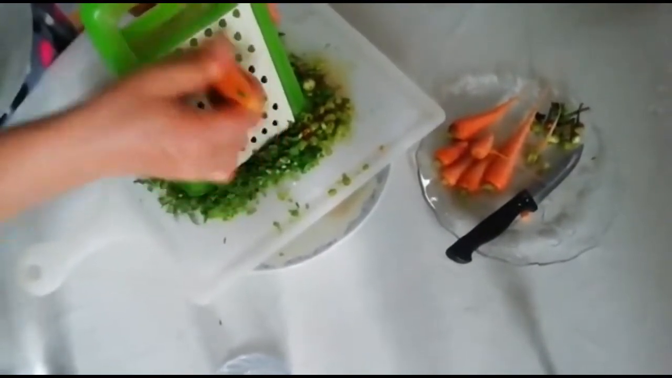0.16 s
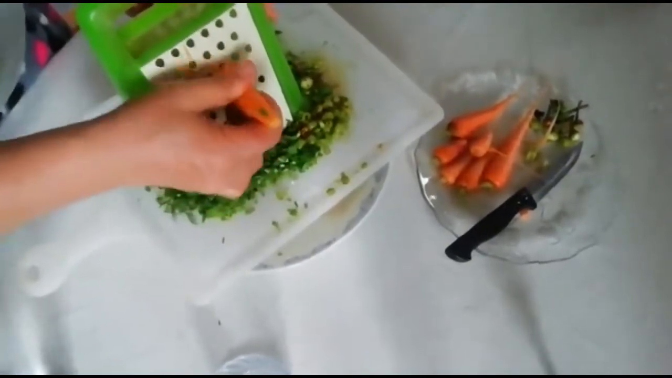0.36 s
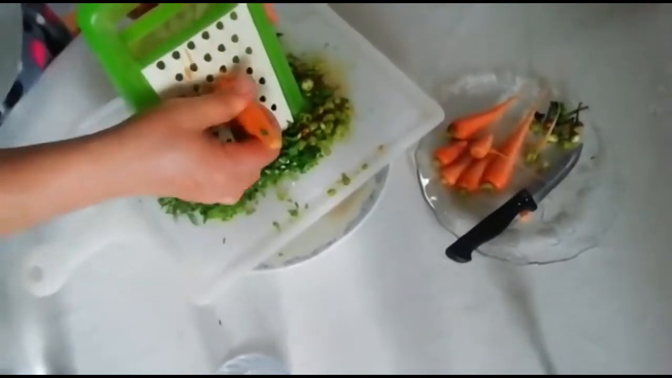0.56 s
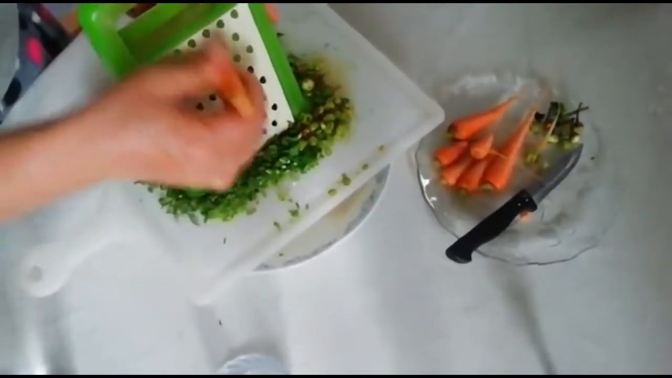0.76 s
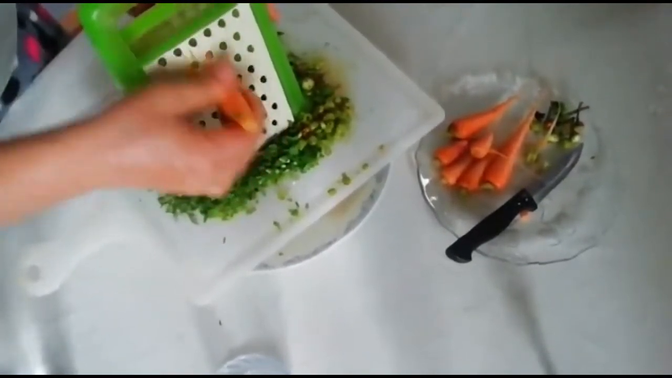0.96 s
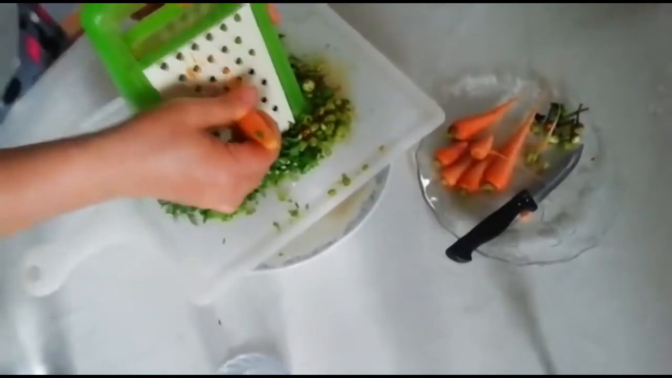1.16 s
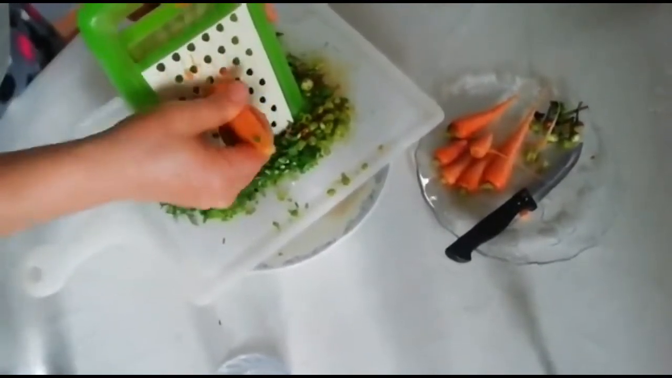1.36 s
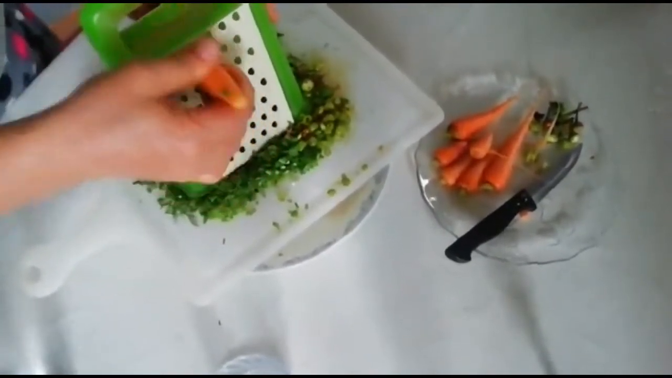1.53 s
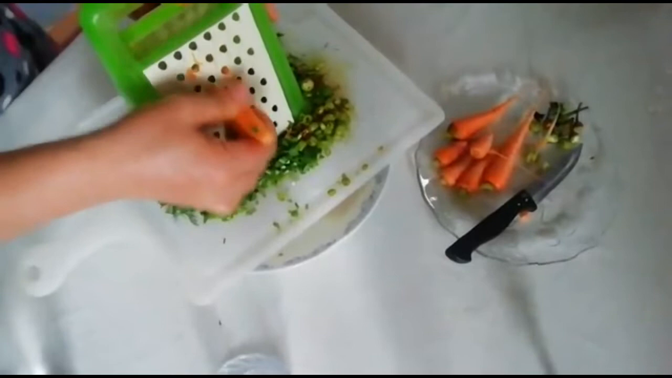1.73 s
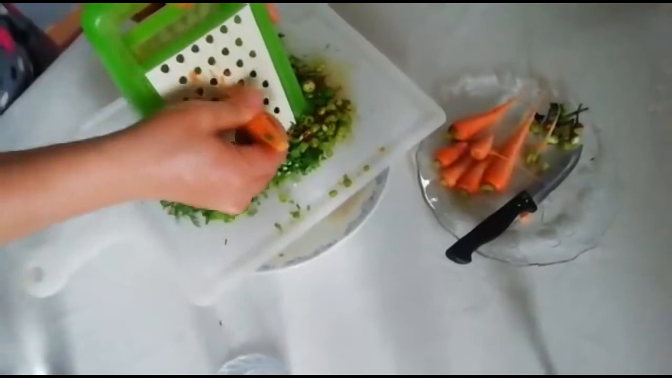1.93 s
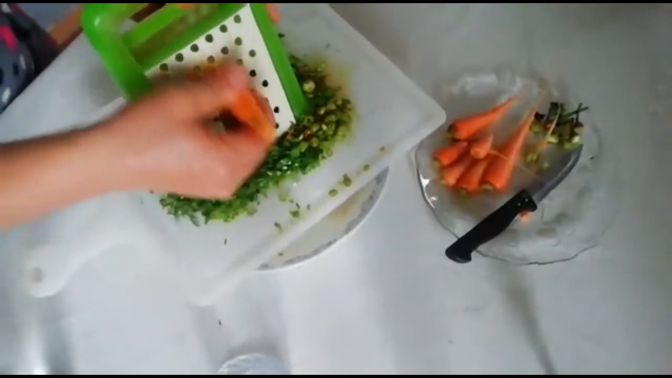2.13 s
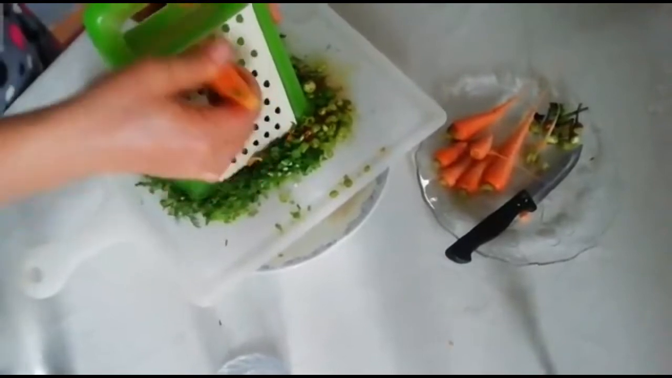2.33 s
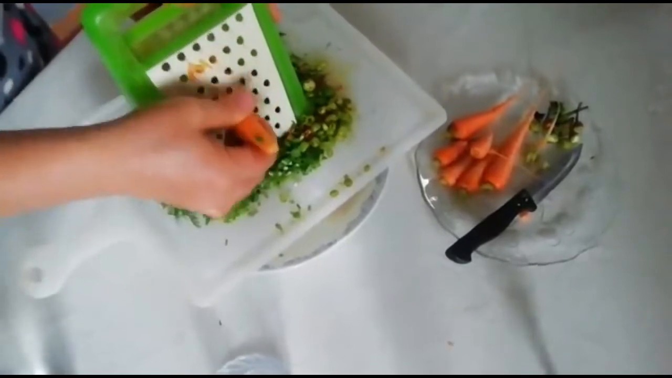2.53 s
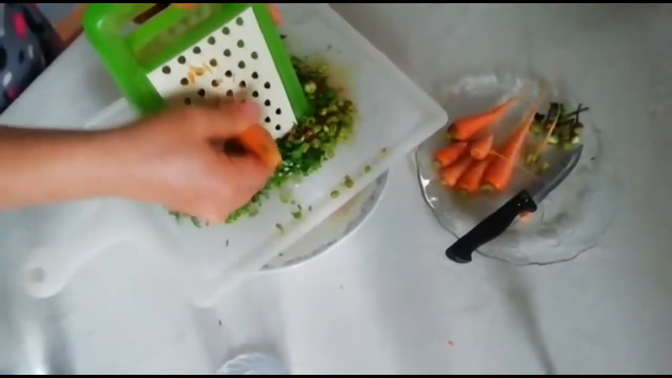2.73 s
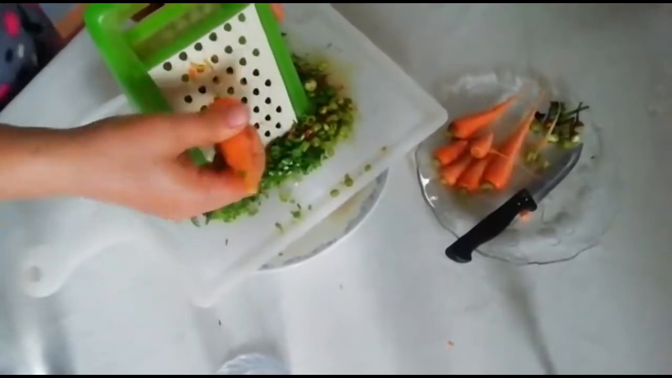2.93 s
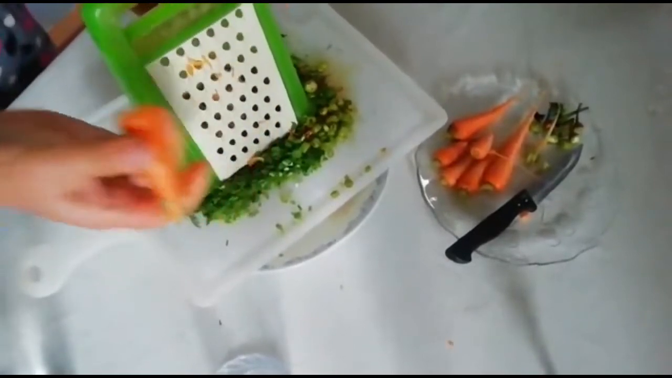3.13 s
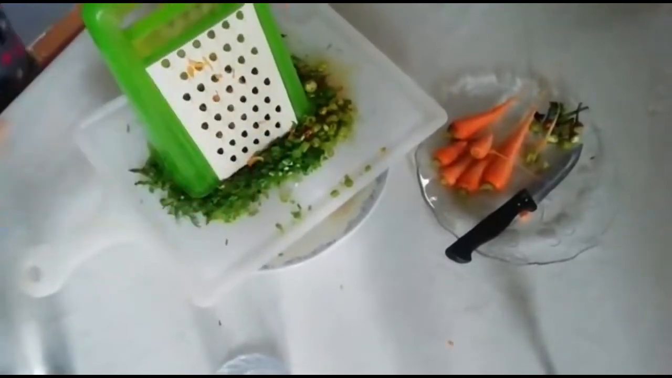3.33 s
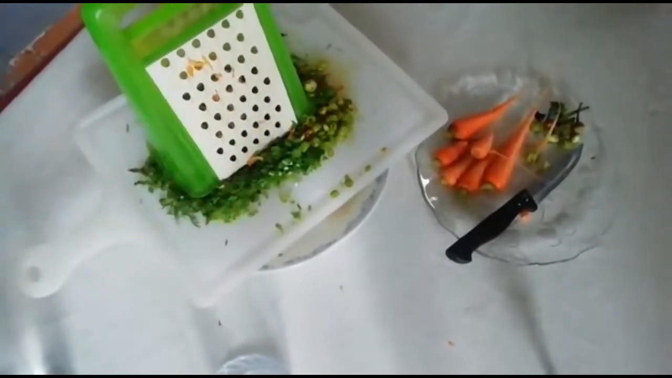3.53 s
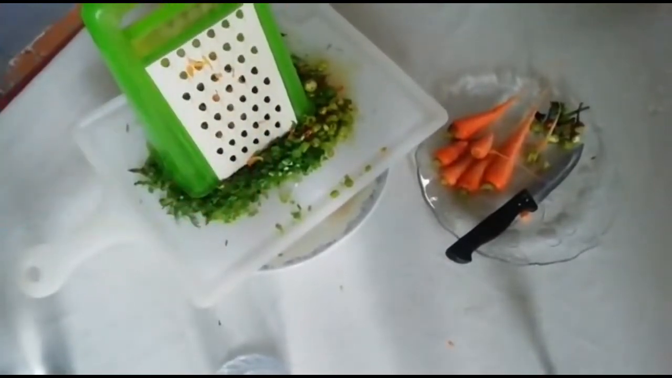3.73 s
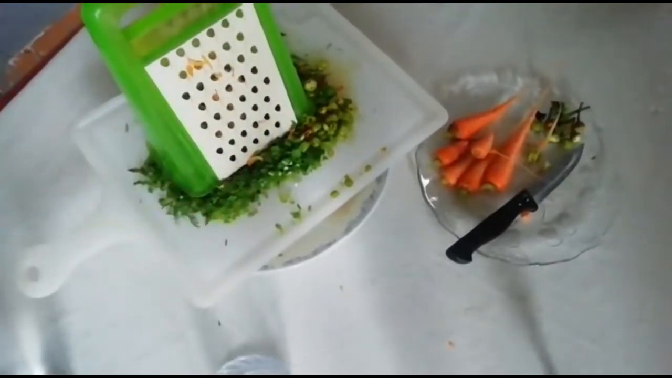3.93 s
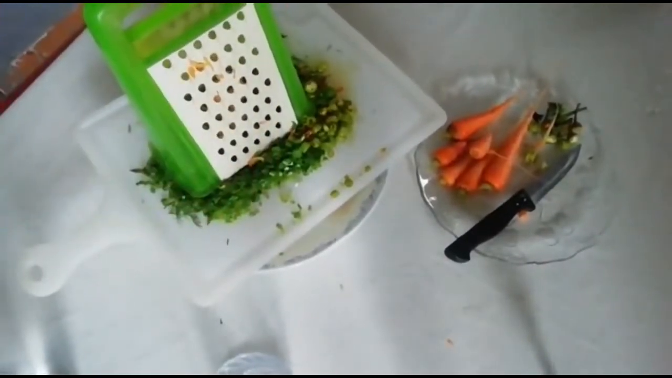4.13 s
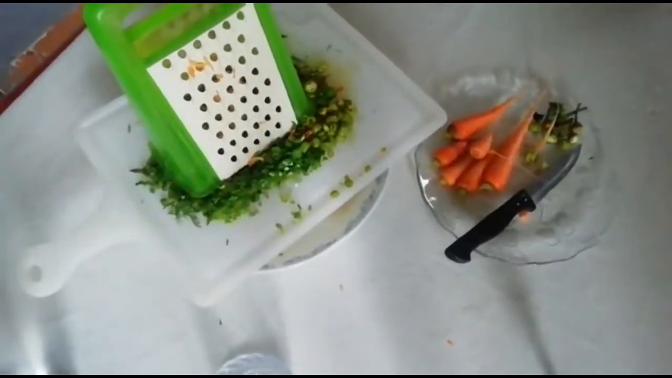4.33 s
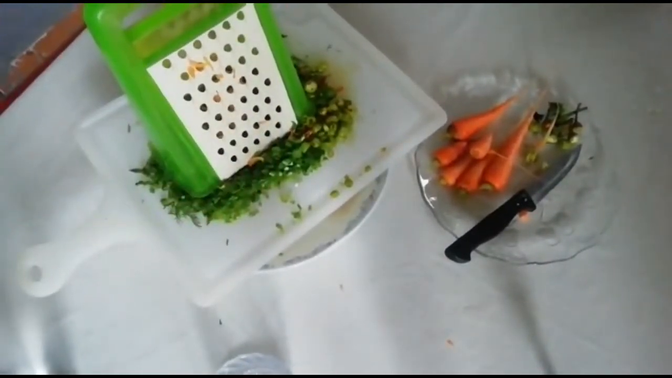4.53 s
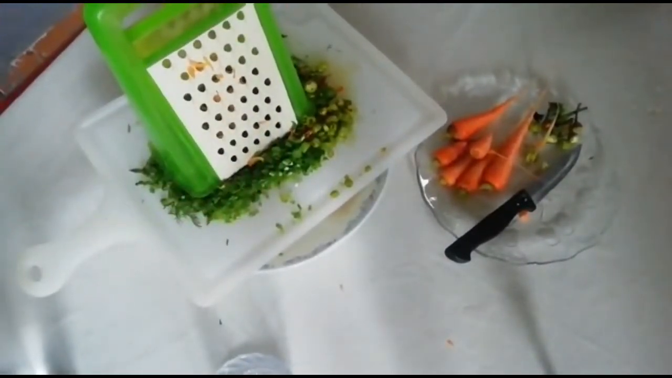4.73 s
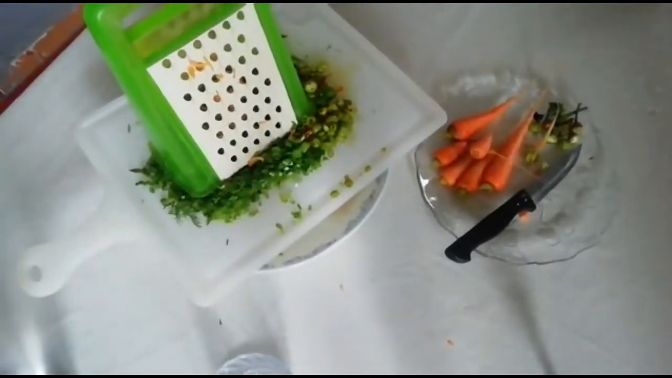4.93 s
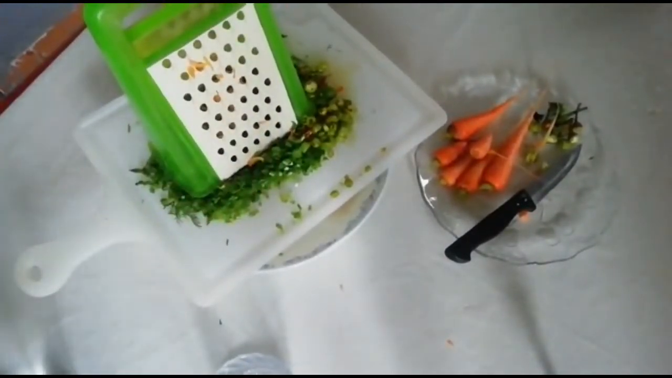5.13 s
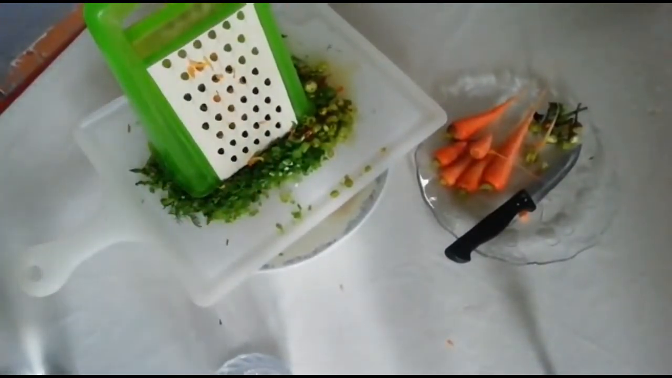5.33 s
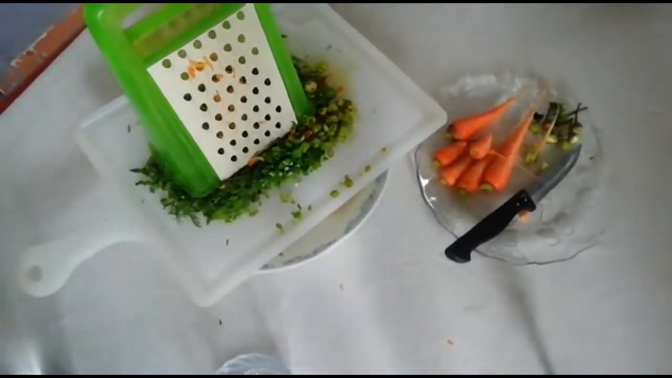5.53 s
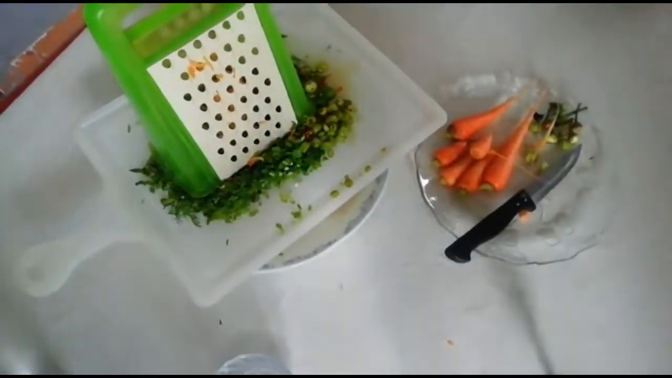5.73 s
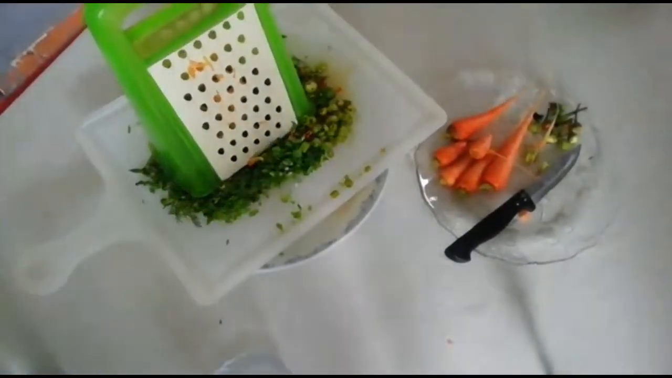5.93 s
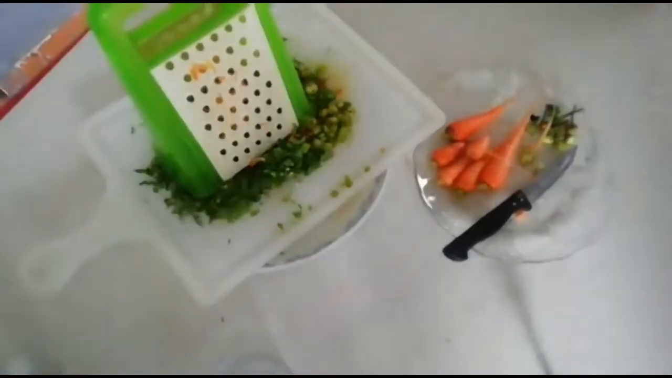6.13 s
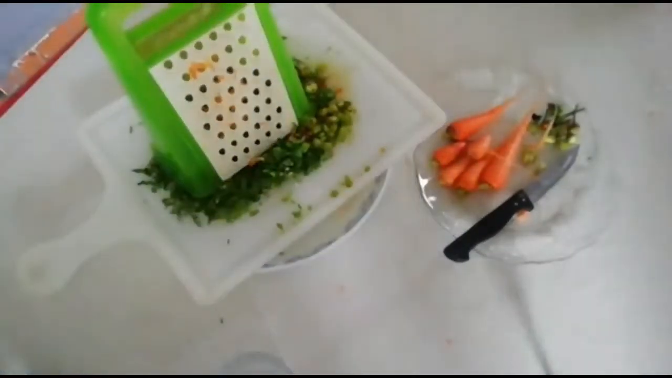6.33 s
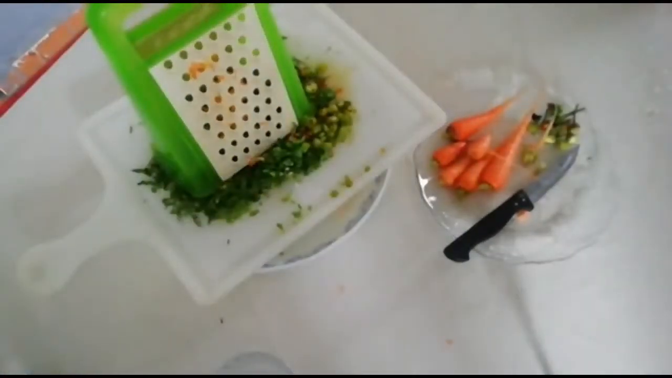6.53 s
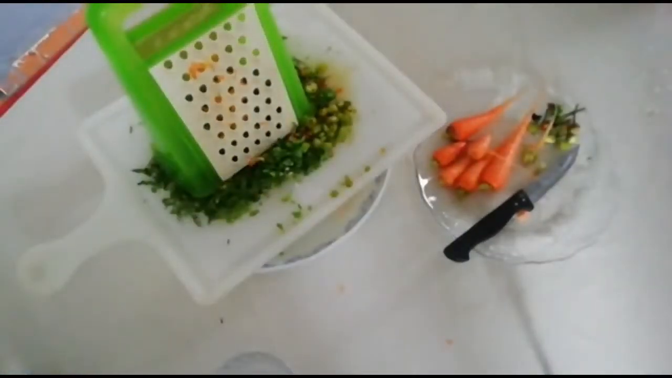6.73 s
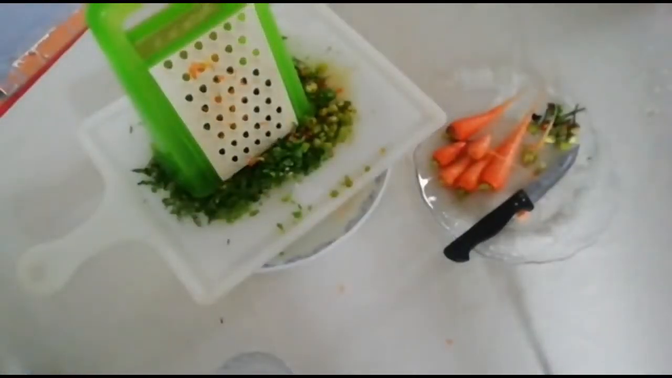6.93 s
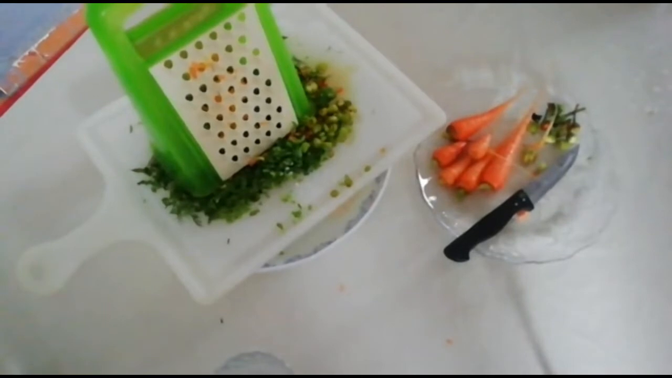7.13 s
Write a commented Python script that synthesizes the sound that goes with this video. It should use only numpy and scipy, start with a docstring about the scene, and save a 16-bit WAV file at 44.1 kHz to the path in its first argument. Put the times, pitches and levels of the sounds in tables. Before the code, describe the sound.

Brisk, coarse rasping of carrot on a plastic box grater, close up, stops after about three seconds, leaving faint floor booms, rustling and a light knock.

```python
"""Quick rasping strokes: a carrot is grated by hand on a plastic box grater, close to two microphones.
Each stroke tears fibres on row after row of teeth, as bursts of noise that ring the modes of the hollow box
and of the table; the way back only brushes the box. Then the hand leaves: someone walks about the quiet
kitchen, the floor booms as a low wavering tone, clothes rustle as noise, the table takes a light knock.
Steady room noise and faint appliance tones lie beneath."""
import sys
import numpy as np
from scipy import signal
from scipy.fft import rfft, irfft, next_fast_len
from scipy.io import wavfile
from scipy.ndimage import uniform_filter1d, map_coordinates

SR = 44100
rng = np.random.default_rng(int(sys.argv[2]) if len(sys.argv) > 2 else 0)


def transcribe(u):
    """Save the signal u as a 16-bit wav file named by the first command-line argument.

    u: samples, shape (n,) or (channels, n), limited to [-1, 1]; the rate is SR.
    q: integer samples, one column per channel.
    """
    v = np.clip(np.atleast_2d(u).T, -1, 1)
    q = np.round(v * 32767).astype(np.int16)
    wavfile.write(sys.argv[1], SR, q)


N = 317059
EARLY = SR // 5  # samples
# time starts early, so that a stroke before zero still rings
TIME = np.arange(-EARLY, N) / SR

# cutting strokes, as drive before the mix: touch t/s, rise to full pressure/s, time at full pressure/s,
# tearing level/dB, box level/dB, tilt of upper over lower box modes/dB, low box modes level/dB, table level/dB
CUTTING_STROKES = [(-.07, 0.018, 0.042, -14.5, -17, -2.5, -17, -30.5),
                   (0.176, 0.041, 0.034, -13.5, -23.5, 5, -17.5, -37.5),
                   (0.46, 0.03, 0.024, -14, -18.5, 9.5, -21, -30.5),
                   (0.733, 0.0038, 0.052, -19.5, -21, 1.5, -24, -35),
                   (0.994, 0.02, 0.063, -14, -21, 0.5, -21.5, -39),
                   (1.265, 0.025, 0.022, -13.5, -16, -4.5, -19.5, -32.5),
                   (1.525, 0.025, 0.056, -13.5, -15, -0.5, -18.5, -30.5),
                   (1.805, 0.0049, 0.079, -13, -17, -1, -19, -26.5),
                   (2.069, 0.0036, 0.05, -14, -18, -4.5, -21, -31.5),
                   (2.336, 0.026, 0.059, -12.5, -14, -2.5, -23, -35.5),
                   (2.607, 0.024, 0.041, -14.5, -15.5, -2, -25.5, -37)]
# likeness of left and right in the room: f/Hz, likeness (1 is identical)
LEFT_RIGHT_LIKENESS = [(60, 1), (240, 0.96), (950, 0.068), (3770, 0.095), (15000, 0.059)]

AIR_LAG_S = .0006  # floor, room noise and hum reach the left microphone later


def amp(db):
    """Gain of a level in dB."""
    return 10 ** (np.asarray(db) / 20)


def unit(x):
    """Scaled to rms 1."""
    return x / np.sqrt(np.mean(x ** 2) + 1e-20)


def along(points, hz):
    """Interpolates (Hz, value) points on a log frequency axis."""
    f, v = np.transpose(points)
    return np.interp(np.log(hz + 1), np.log(f + 1), v)


def add(track, s, shape):
    """Adds a shape to a track from time s on, cut off at the track's end."""
    part = track[..., EARLY + round(s * SR):][..., :np.shape(shape)[-1]]
    part += shape[..., :part.shape[-1]]


def wobble(rate):
    """A smooth random curve, rate knots a second."""
    where = (TIME - TIME[0]) * rate
    return map_coordinates(rng.standard_normal(int(where[-1]) + 4), [where])


def swell(length, early=1):
    """A smooth rise and fall over length seconds; early under 1 brings the peak forward."""
    return np.sin(np.pi * np.linspace(0, 1, round(abs(length) * SR) + 2) ** early)


def filtered(x, response):
    """x through a complex response of frequency, with padding so that the tail does not wrap."""
    m = next_fast_len(x.shape[-1] + SR // 2)
    spectrum = rfft(x, m) * response(np.fft.rfftfreq(m, 1 / SR))
    return irfft(spectrum, m)[..., :x.shape[-1]]


def modes(resonances):
    """Causal response of resonances (Hz, width Hz, dB) with alternating signs."""
    def response(f):
        total = 0
        for k, (centre, width, db) in enumerate(resonances):
            damping = 1j * f * width
            total = total + (-1) ** k * amp(db) * damping / (centre * centre - f * f + damping)
        return total
    return response


def driven(gain, response, spread_db, count):
    """Unrelated streams of tiny unequal ruptures under one gain, through a response that keeps their rms."""
    sizes = amp(spread_db * rng.standard_normal((count, len(TIME))))
    grit = rng.standard_normal((count, len(TIME))) * sizes
    return filtered(grit * gain, response) / np.std(filtered(grit, response))


def pair(response, alike, length=len(TIME)):
    """Stereo noise of rms 1, partly shared by both sides."""
    def shaped(hz):
        turn = np.arccos(np.clip(along(alike, hz), -1, 1)) / 2
        return response(hz) * [np.cos(turn), np.sin(turn)]
    mid, side = filtered(rng.standard_normal((2, length)), shaped)
    return unit(np.array([mid + side, mid - side]))


def lagged(x, lag_s):
    """Sound that reaches the right microphone lag_s before the left."""
    return filtered(x, lambda hz: np.exp(-1j * np.pi * hz * lag_s * np.array([[1], [-1]])))


def room(x):
    """The walls answer differently on each side, swinging between two tails; each frequency dies at its own speed."""
    # reverberation: f/Hz, t60/s
    decay = [(200, 0.23), (1000, 0.24), (4000, 0.27), (12000, 0.17)]
    hz, t, z = signal.stft(rng.standard_normal((2, 2, SR // 2)), SR, nperseg=256)
    # long waves reach both microphones alike
    alike = np.clip(along(LEFT_RIGHT_LIKENESS, hz), 0, 1)[:, None]
    z[:, 1] = alike * z[:, 0] + np.sqrt(1 - alike ** 2) * z[:, 1]
    fade = amp(-60 * t / along(decay, hz)[:, None])
    tails = signal.istft(z * fade, SR, nperseg=256)[1]
    tails = tails / np.linalg.norm(tails, axis=2, keepdims=True)
    turn = 2 * np.pi * 1.3 * TIME  # 1.3 swings a second
    answer = 0
    for weight, tail in zip((np.cos(turn), np.sin(turn)), tails):
        answer = answer + signal.fftconvolve(x * weight, tail, axes=1)[:, :len(TIME)]
    return answer


def kitchen_air():
    """Steady room noise with faint appliance tones, slightly unsteady in level and phase."""
    # noise spectrum, relative: f/Hz, level/dB per Hz
    air_colour = [(24, -29.5), (40, -3), (218, -7), (368, -14.5), (720, -16.5), (1250, -15.5), (2210, -22),
                  (5700, -23), (7000, -24), (8000, -19.5), (9900, -29), (15400, -31.5)]
    # appliance tones: f/Hz, level/dB rms
    appliances = [(500.6, -60.5), (631.7, -65), (7919, -72)]
    tones = 0
    for hz, db in appliances:
        level = np.sqrt(2) * amp(db + .6 * wobble(9.0))
        tones = tones + level * np.sin(2 * np.pi * hz * TIME + .3 * wobble(3.1))
    noise = pair(lambda hz: amp(along(air_colour, hz)), LEFT_RIGHT_LIKENESS)
    air = amp(-53.5 + 0.37 * wobble(3.8)) * noise
    return lagged(air + tones, AIR_LAG_S)


def walking():
    """Steps make the floor boom at its own wavering pitch; clothes and feet rustle as bands of noise."""
    # footsteps: t/s, length/s, nominal floor boom level/dB
    footsteps = [(2.795, 0.19, -54.5), (3.654, 0.45, -52), (4.208, 0.28, -50.5), (4.723, 0.2, -52),
                 (5.204, 0.3, -51), (6.131, 0.24, -54), (6.653, 0.21, -53)]
    # clothes and feet: t/s, length/s, nominal level/dB, centre f/Hz, width/octaves, peak early <1 or late >1
    rustles = [(2.924, 0.025, -51, 1505, 1.5, 0.37), (3.689, 0.16, -56, 5000, 1.36, 1.33),
               (3.81, 0.19, -52.5, 3800, 1.4, 0.54), (3.845, 0.055, -49, 6040, 0.94, 0.55),
               (4.401, 0.075, -49.5, 1190, 1.2, 0.35), (4.683, 0.15, -54.5, 2830, 1.55, 0.33),
               (4.799, 0.14, -55, 8000, 2.1, 1.15), (5.348, 0.077, -54, 3517, 4.1, 0.59),
               (5.686, 0.043, -60.5, 3000, 1.04, .5), (6.001, 1.07, -64, 1125, 0.33, 1.7),
               (6.916, 0.14, -57, 1170, 0.43, 1.1)]
    # faint taps somewhere in the kitchen: t/s, peak level/dB, f/Hz, t60/s
    taps = [(4.408, -40, 1350, .025), (6.969, -39, 2600, .002)]
    boom = np.full(len(TIME), amp(-62.0))
    rustle = np.zeros((2, len(TIME)))
    for s, length, db in footsteps:
        add(boom, s, amp(db) * swell(length))  # weight builds up, then lifts
    for s, length, db, hz, octaves, early in rustles:
        def band(f):
            bell = np.exp(-.5 * (np.log2((f + 1) / hz) / octaves) ** 2)
            return bell / np.sqrt(f + 100) / (1 + (f / 9500) ** 8)
        shape = amp(db) * swell(length, early)
        noise = pair(band, [(300, 0.71), (1500, 0.065)], 2 * SR)
        add(rustle, s, shape * noise[:, :len(shape)])
    pitch_hz = 28 + 1.2 * wobble(7.7)
    floor = np.sqrt(2) * amp(2.4 * wobble(22)) * np.sin(2 * np.pi * np.cumsum(pitch_hz) / SR)
    rustle = rustle * amp(2.8 * wobble(70))
    t = np.arange(SR // 5) / SR
    for s, db, hz, t60 in taps:
        add(rustle, s, amp(db - 60 * t / t60) * np.sin(2 * np.pi * hz * t))
    return lagged(boom * floor, AIR_LAG_S) + rustle + amp(-2) * room(rustle)


def table():
    """Strokes shake the table's modes, most near their end; a leaning hand and soft blows ring its top."""
    # table resonances: f/Hz, width/Hz, level/dB
    table_modes = [(41.4, 15, 2.5), (79.55, 31, -1), (129.5, 17, 4.5), (270, 51, -13)]
    # soft blows: t/s, peak level/dB before the room
    soft_blows = [(3.91, -27.5), (3.926, -26.5)]
    shake, lean, blows = np.zeros((3, len(TIME)))
    t = np.arange(SR // 2) / SR
    top = modes(table_modes[2:])  # light contacts move the top, not the legs
    for touch, rise, hold, *_, db in CUTTING_STROKES:
        add(shake, touch, amp(db) * swell(1.7 * (rise + hold)))
    add(shake, 0, amp(-46.5) * np.ones(round(2.72 * SR)))  # the hand keeps the grater rocking
    add(lean, 3.79, amp(-45.0) * swell(0.19))
    ring = filtered(np.gradient(t * np.exp(-t / 0.0063)), top)
    for s, db in soft_blows:
        add(blows, s, amp(db) * ring / np.abs(ring).max())
    shaken = driven(shake, modes(table_modes), spread_db=1.0, count=1)
    return shaken + driven(lean, top, spread_db=6, count=1) + blows


def patchy(x, depth_db, size, count, order):
    """Colour shifting at random, alike in all streams: patches of size frames by count bins."""
    z = signal.stft(x, nperseg=order)[2]
    field = uniform_filter1d(rng.standard_normal(z.shape[1:]), size=count, axis=0)
    field = unit(uniform_filter1d(field, size=size, axis=1))
    gain = amp(depth_db * field - np.log(10) / 20 * depth_db ** 2)  # keeps the mean power
    return signal.istft(z * gain, nperseg=order)[1][:, :len(TIME)]


def hand_pressure(moments):
    """Force of the hand over one stroke; from touch to full pressure it builds evenly, so the bite comes early."""
    # before landing, at touch, at full pressure, at the end of the cut, lifted: level/dB
    pressure_db = [-66.5, -23, 0, -0.5, -43]
    pressure = amp(np.interp(TIME, moments, pressure_db, left=-120, right=-120))
    rising = (TIME > moments[1]) & (TIME < moments[2])
    pressure[rising] = np.interp(TIME[rising], moments, amp(pressure_db))
    return pressure


def cutting():
    """Drives of the strokes: pressure tears fibres and shakes the box, rows of teeth dig in and let go."""
    # the hardest catches of a row of teeth: t/s, drive level/dB
    hard_bites = [(0.188, -14), (0.204, -11.5), (0.214, -5.5), (0.235, -6.5), (0.244, -11.5),
                  (0.473, -16.5), (0.486, -5), (0.512, -11), (0.544, -12), (0.753, -15), (0.763, -14.5),
                  (0.781, -4), (0.788, -4.5), (1.014, -15), (1.031, -12), (1.059, -9), (1.296, -5.5),
                  (1.307, -5), (1.548, -15.5), (1.573, -10.5), (1.59, -12), (1.609, -8.5), (1.824, -10.5),
                  (1.839, -13), (1.882, -7), (2.089, -7.5), (2.114, -6.5), (2.129, -8.5), (2.401, -6),
                  (2.64, -11.5), (2.647, -10)]
    landing, lift_s = .35, 0.03  # fade in as a share of the rise; fade out after the cut
    row_s, row_scatter_s = 0.015, 0.0032  # time from one row of teeth to the next, and its unevenness
    row_db, row_scatter_db = 1.5, 2.5  # drive of an ordinary catch over the steady tearing, and its spread
    catch_s, let_go_s = 0.00087, 0.0036  # rise and decay of a catch
    glide_s, glide_db, glide_fade_db = 0.11, -13.5, 14.5  # start relative to the box level, then fade
    sag_db_per_s = 81  # the upper box modes give way to the lower as the carrot slides down
    tear, box, low, glide, tilt_db, rows = np.zeros((6, len(TIME)))
    t = np.arange(SR // 20) / SR
    catch = (1 - np.exp(-t / catch_s)) * np.exp(-t / let_go_s)
    chance = rng.standard_normal((len(CUTTING_STROKES), 12, 2))  # 12 rows a stroke
    for stroke, draws in zip(CUTTING_STROKES, chance):
        touch, rise, hold, tear_db, box_db, upper_db, low_db, _ = stroke
        fade_in = landing * abs(rise)
        moments = touch + np.cumsum([-fade_in, fade_in, abs(rise), abs(hold), lift_s])
        pressure = hand_pressure(moments)
        tear += amp(tear_db) * pressure
        box += amp(box_db) * pressure
        low += amp(low_db) * pressure
        # after the cut the carrot slides off the teeth and keeps the middle box modes humming
        since = TIME - moments[3]
        sliding = (since > 0) & (TIME < moments[3] + glide_s)
        glide += amp(box_db + glide_db - glide_fade_db * np.clip(since / glide_s, 0, 1)) * sliding
        now = TIME > moments[0]
        tilt_db[now] = upper_db - sag_db_per_s * np.clip(TIME[now] - moments[2:4].mean(), -.1, .1)
        for k, (late, size) in enumerate(draws):
            s = touch + (k + 1) * row_s + row_scatter_s * late
            force = np.interp(s, TIME, pressure) ** 2
            add(rows, s, amp(tear_db + row_db + row_scatter_db * size) * force * catch)
    for s, db in hard_bites:
        add(rows, s, amp(db) * catch)
    return tear, box, low, glide, tilt_db, rows


def brushing():
    """Drives of the carrot on its way back, brushing the box, and of a faint drag that never quite leaves it."""
    # brushes: t/s, length/s, box drive level/dB
    brushes = [(0.098, 0.044, -33), (0.148, 0.021, -23.5), (0.322, 0.029, -32.5), (0.379, 0.027, -36.5),
               (0.429, 0.011, -31), (0.655, 0.04, -34.5), (0.915, 0.019, -31), (0.938, 0.025, -27.5),
               (1.169, 0.079, -33.5), (1.447, 0.024, -33), (1.475, 0.028, -32.5), (1.707, 0.037, -38),
               (1.75, 0.065, -37.5), (1.965, 0.036, -33.5), (1.994, 0.023, -25), (2.239, 0.022, -47),
               (2.3, 0.022, -40)]
    brush, scrape = np.zeros((2, len(TIME)))
    for s, length, db in brushes:
        add(brush, s, amp(db) * np.sqrt(np.abs(swell(length, 0.62))))  # peaks before its middle
        add(scrape, s, amp(db - 13.0) * swell(length))
    brush += amp(-54 + 4.5 * wobble(25)) * (TIME < 2.2)  # uneven drag, until 2.2 s
    return brush, scrape


def grater():
    """Fibres tear on the teeth and ring the box: one stream for both microphones, one for each alone."""
    # loose shreds snap: t/s, peak drive level/dB
    snaps = [(0.151, -29.5), (0.343, -20.5), (0.3746, -25.5), (1.1745, -30.5), (1.4225, -28), (1.48, -26.5),
             (1.717, -30), (2.3014, -34.5), (2.5829, -31.5), (2.927, -44), (3.518, -45.5)]
    # spectrum of tearing, relative: f/Hz, level/dB per Hz
    tear_colour = [(880, -31), (1500, -7), (1990, -8), (2670, -3), (3400, -4), (4200, -5), (4850, -3.5),
                   (5390, -8), (6870, -6.5), (7800, -1), (9770, -10.5), (15400, -18)]
    # box resonances, lower to upper: f/Hz, width/Hz, level/dB
    box_modes = [(758, 80, -2.5), (887, 88, 2.5), (1035, 54, -2), (1204, 51, 4.5), (1363, 45, -4),
                 (1870, 47, -13)]
    # low box resonances that the grip damps: f/Hz, width/Hz, level/dB
    low_box_modes = [(285.4, 81, -4.5), (347.4, 49, -2.5), (433, 25, 1), (523.2, 21, 9), (618, 42, 3.5)]
    tooth_db = 4  # unevenness from tooth to tooth
    tear, box, low, glide, tilt_db, rows = cutting()
    brush, scrape = brushing()
    tear = tear * amp(tooth_db * wobble(260) - 2.5) + scrape + rows  # single teeth between the rows
    box = box * amp(tooth_db * wobble(100) - 0.5) + amp(-4.5) * rows
    low = low * amp(3.1 * wobble(90))
    t = np.arange(SR // 20) / SR
    for s, db in snaps:
        add(tear, s, amp(db) * np.exp(-t / 0.0019))
    fibres = driven(tear, lambda hz: amp(along(tear_colour, hz)), spread_db=6.0, count=3)
    shell = driven(box * amp(-tilt_db / 2 - 3.5), modes(box_modes[:3]), spread_db=4.0, count=3)
    shell -= driven(box * amp(tilt_db / 2 - 4.5), modes(box_modes[3:]), spread_db=4.0, count=3)
    shell += driven(low, modes(low_box_modes), spread_db=5, count=3)
    # a light touch rings the upper modes most
    hum = driven(brush * amp(2.1 * wobble(120)), modes(box_modes[3:-1]), spread_db=3.5, count=3)
    hum += driven(brush * amp(-7.5) + glide, modes(box_modes[1:3]), spread_db=2, count=3)
    # the grip flexes the box, so its modes waver a few percent
    straight = np.arange(len(TIME))
    bent = straight + .001 * SR * wobble(12)
    shell = np.array([np.interp(bent, straight, stream) for stream in shell])
    hum = np.array([np.interp(bent, straight, stream) for stream in hum])
    # each tooth and grip radiates a different colour
    fibres = patchy(fibres, 3.6, size=3, count=5, order=256)
    shell = patchy(shell, 3, size=4, count=2, order=512)
    return fibres + shell + hum


def heard(streams):
    """The grater at both close microphones: shared and separate direct sound, then the room."""
    # phase between the microphones: f/Hz, radians by which left leads
    left_lead = [(0, 0), (340, -0.1), (450, -1.0), (860, -4.7), (1380, -5.5), (2500, -4.0), (3360, -2.3),
                 (3880, -2.5), (5170, -0.5), (8180, 3.0), (9300, 5.9), (10200, 5.7), (12100, 2.4),
                 (14000, 2.5), (15200, 10.0)]
    # balance: f/Hz, left over right level/dB
    left_lean = [(60, 0.0), (110, 0.5), (200, -0.5), (380, -1.0), (700, -4.5), (1290, -0.5), (2380, -1.0),
                 (4400, -2.5), (8120, 10.0), (11500, 1.5)]
    # sound that reaches both microphones alike: f/Hz, share of power
    common = [(250, .97), (600, .9), (1200, .97), (2500, .62), (8000, .45), (15000, .55)]
    side = np.array([[.5], [-.5]])

    def shared(hz):
        return np.sqrt(along(common, hz)) * np.exp(1j * side * along(left_lead, hz))

    direct = filtered(streams[0], shared)
    direct = direct + filtered(streams[1:], lambda hz: np.sqrt(1 - along(common, hz)))
    return filtered(direct + amp(-5.5) * room(direct), lambda hz: amp(side * along(left_lean, hz)))


def scene():
    """Grater and table near by, the walking person and the room around."""
    wood = lagged(table(), .0003)  # seconds later at the left microphone
    wood = wood + amp(-4.0) * room(wood)
    mix = kitchen_air() + walking() + wood + amp(-3.0) * heard(grater())
    return mix[:, EARLY:]


def record(dry):
    """The loudest peaks are rounded off; nothing is kept from 15620 Hz up."""
    clipped = dry / (1 + np.abs(dry / 1.05) ** 8) ** (1 / 8)
    return filtered(clipped, lambda hz: hz < 15620)


dry = scene()
out = record(dry)
transcribe(out)
```